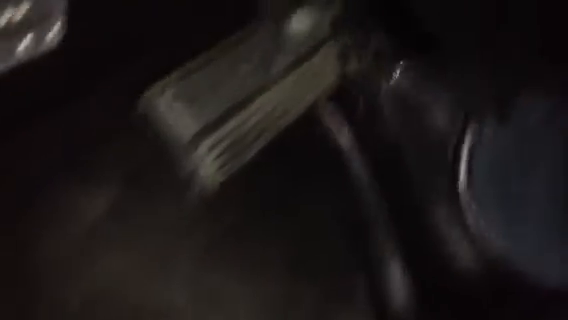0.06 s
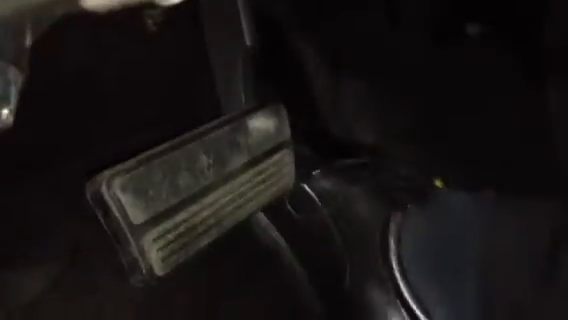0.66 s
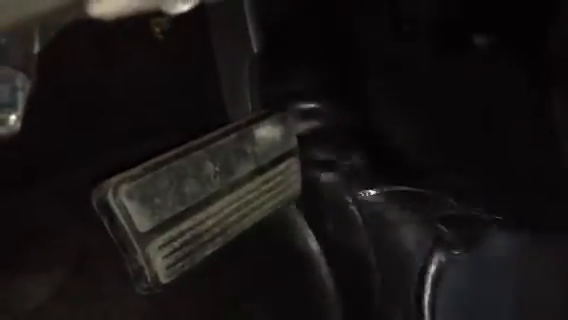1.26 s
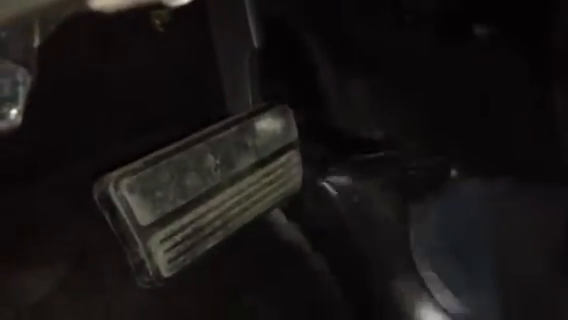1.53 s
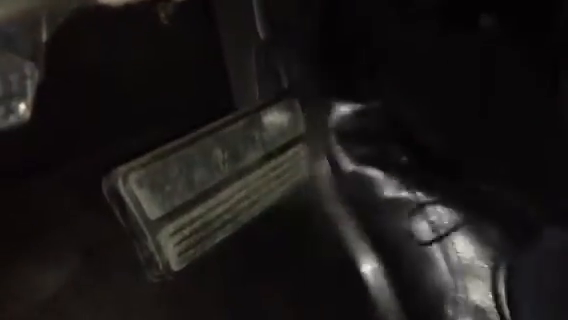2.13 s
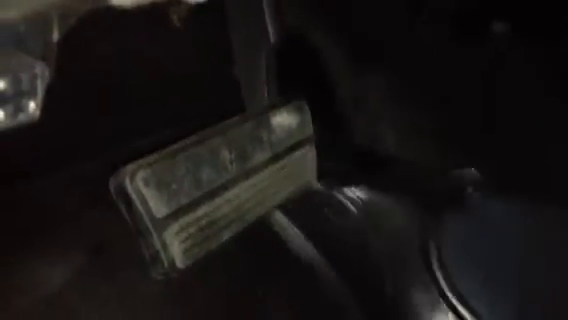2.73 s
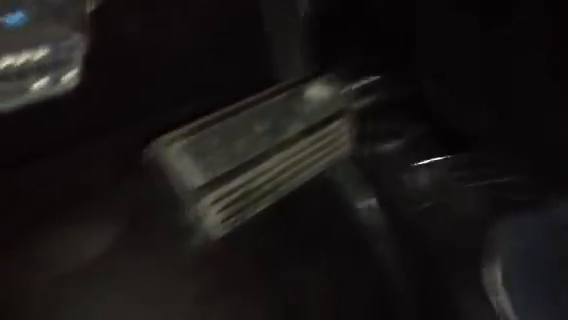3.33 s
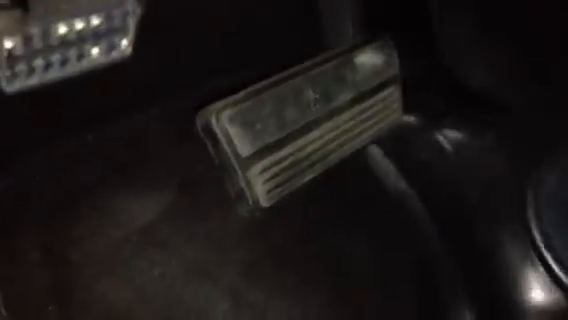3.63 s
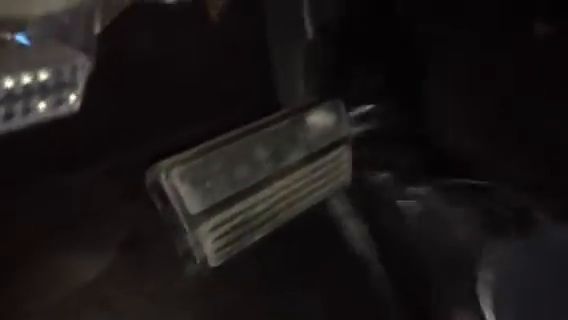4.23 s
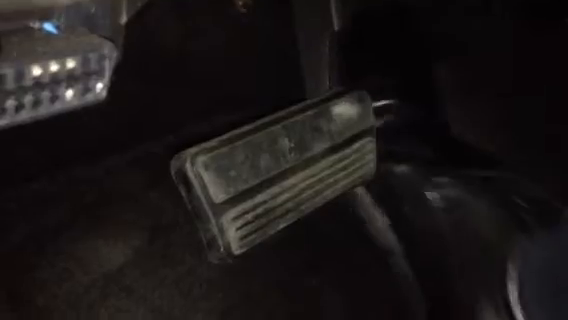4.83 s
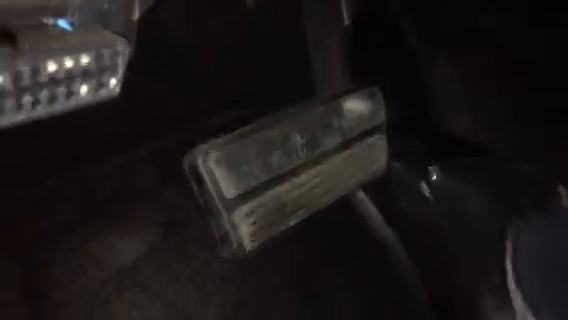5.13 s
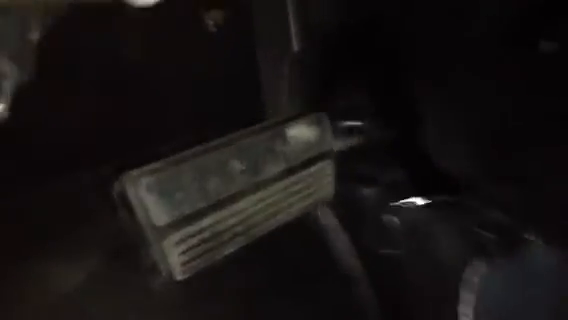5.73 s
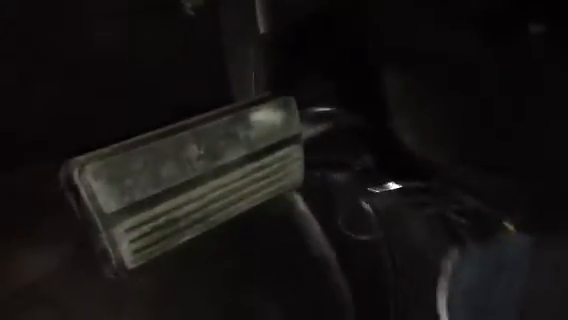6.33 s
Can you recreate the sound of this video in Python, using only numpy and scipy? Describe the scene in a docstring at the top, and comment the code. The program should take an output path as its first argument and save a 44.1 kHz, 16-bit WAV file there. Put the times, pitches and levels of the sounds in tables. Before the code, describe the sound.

Close in a car's footwell, a quickly pumped pedal rubs faintly and knocks against its stops, with some sharper clicks later on.

```python
"""Soft rubbing strokes come first, over faint steady noise: a shoe is pumping a parked car's accelerator.
We listen from close by in the footwell. The linkage (the parts the pedal moves) rubs on every stroke.
From about one second on, the pedal bumps its stops, which shakes the floor and makes the cabin boom briefly.
Now and then the plastic and the linkage click, and shoe and trouser cloth rustle as the foot moves."""
import sys
import numpy as np
from scipy import signal
from scipy.fft import rfft, irfft
from scipy.io import wavfile
from scipy.ndimage import uniform_filter1d

SR = 44100
rng = np.random.default_rng(int(sys.argv[2]) if len(sys.argv) > 2 else 0)


def to_wav(s):
    """Save 16-bit WAV."""
    ch = np.atleast_2d(s).T  # columns
    pcm = np.round(np.clip(ch, -1, 1) * 32767)  # PCM
    wavfile.write(sys.argv[1], SR, pcm.astype(np.int16))


N = 285371
TIME = np.arange(N) / SR
HIT_TIME = np.arange(SR // 4) / SR  # the time within one bump or click

# the pedal hits a stop; the rows near 4.99, 5.10 and 5.47 s give the low thud beneath a loud click: (time [s],
# level [dB], floor panel pitch [Hz], scuff level [dB])
BUMPS = [(0.995, -40, 240, -57), (1.071, -26, 233, -77), (1.303, -14, 237, -44.5),
         (1.4945, -19.5, 243, -66), (1.552, -27.5, 330, -45.5), (1.711, -29, 256, -51),
         (1.8146, -31.5, 251, -64.5), (2, -30.5, 284, -47), (2.122, -11, 243, -40.5),
         (2.194, -27, 240, -45.5), (2.3477, -36, 262, -50.5), (2.522, -30, 244, -62),
         (2.6994, -34, 263, -48.5), (2.7655, -19.5, 244, -68), (2.878, -36, 323, -50),
         (3.1046, -28.5, 262, -50), (3.16, -18, 241, -64), (3.2722, -30, 244, -53), (3.332, -43, 338, -53),
         (3.5643, -31, 253, -47), (3.6965, -34, 287, -50), (3.93, -31, 286, -48), (4.0794, -32.5, 288, -53),
         (4.2107, -28.5, 240, -72), (4.389, -25, 264, -49), (4.99, -28, 357, -50), (5.101, -22, 370, -32.5),
         (5.469, -36, 350, -70), (6.193, -41, 360, -55.5)]
# cabin air and trim ring on after a bump: (pitch [Hz], time to fade by 60 dB [s], gain [dB])
CABIN_TONES = [(99.7, 0.66, 20.5), (169.3, 0.3, 3), (209, 0.059, 7), (263, 0.067, 6), (331.2, 0.15, 3.5),
               (391.6, 0.079, 4.5), (684, 0.044, 13), (990, 0.034, 29.5)]
# a bump comes back from seats, doors and roof: (delay [s], gain [dB])
CABIN_ECHOES = [(0.0163, -23), (0.0349, -20)]
# plastic and linkage click: (time [s], level [dB], contact time [ms], rebound delay [ms])
PEDAL_CLICKS = [(2.189, -35.5, 0.49, 0.86), (2.191, -19.5, 0.042, 0.66), (2.7972, -24.5, 0.066, 0.6),
                (3.3015, -14.5, 0.048, 0.64), (3.3328, -31.5, 0.47, 0.81), (3.587, -34.5, 0.56, 0.33),
                (4.5706, -1.5, 0.12, 0.41), (4.5974, -12.5, 0.047, 0.35), (4.6657, -20, 0.29, 0.43),
                (4.7166, -32.5, 0.52, 0.36), (4.7836, -29.5, 0.49, 0.36), (4.9637, -22.5, 0.37, 0.5),
                (4.992, -5, 0.085, 0.396), (4.9935, -11, 0.96, 0.78), (5.0162, -7, 0.056, 0.29),
                (5.084, -25.5, 0.4, 0.91), (5.1012, -12, 0.28, 0.41), (5.102, -14, 0.038, 0.865),
                (5.103, -20, 0.76, 0.63), (5.4696, -21, 0.25, 0.43)]
# the tones that a click sets ringing: (pitch [Hz], width [Hz], gain [dB])
PLASTIC_TONES = [(597, 117, 14.5), (1210, 680, 4), (1836, 1170, 6.5), (3020, 900, 2), (7060, 3400, 2),
                 (12300, 3000, 4.5)]
# runs of pedal strokes: (first stroke [s], last stroke [s], first effort [dB], last effort [dB])
STROKE_RUNS = [(0.218, 0.41, -65.5, -71), (0.612, 1.417, -66.5, -64), (1.61, 2.25, -79, -64),
               (2.54, 3.298, -63.5, -62), (3.531, 4.49, -65.5, -65.5), (4.688, 5.414, -69.5, -63.5),
               (5.62, 5.987, -69, -71)]
# the tones of the rubbing linkage: (pitch [Hz], base width [Hz], gain [dB])
LINKAGE_TONES = [(2625, 480, 4.5), (3055, 560, 2), (5290, 120, 0.5), (6530, 2700, -8.5)]
# the shoe slides to a new place: (time [s], level [dB], half length [s])
SHOE_SLIDES = [(1.548, -55.5, 0.013), (1.633, -56, 0.056), (1.84, -61.5, 0.02), (2, -62, 0.019),
               (2.129, -57, 0.036), (5.128, -67, 0.044), (5.73, -65.5, 0.042), (5.94, -65, 0.55)]
# the tone colour of the rustle: (frequency [Hz], relative level [dB])
CLOTH_COLOUR = [(1500, 3), (3200, 4), (4500, -5.5), (5600, -2.5), (7400, 2), (9800, -5.5), (12000, -2),
                (15500, -7)]
# the tone colour of the background: (frequency [Hz], relative level [dB])
BACKGROUND_COLOUR = [(15, -58), (25, -39), (81, -12.5), (207, 2.5), (278, -4.5), (427, -10.5), (573, -7),
                     (833, -7), (1120, -9.5), (1310, -10.5), (1500, -12), (1810, -12), (2930, -25),
                     (9270, -32), (15000, -34)]
# the footwell lifts or lowers bands of the background: (frequency [Hz], width [Hz], gain [dB])
FOOTWELL_BANDS = [(102, 39, 7), (166, 9, -7.5), (204, 87, 2), (398, 67, -2.5), (833, 58, 4.5),
                  (1110, 64, -2.5), (1286, 69, 5.5), (1870, 210, 1), (4470, 580, -7.5)]
# the background sinks a little at the end: (time [s], gain [dB])
BACKGROUND_FADE = [(5.8, 0), (6.3, -1.3)]


def pedal_bumps(band_ratio=1.34, cushion_hz=560, lead_s=0.00065, scuff_s=0.0052, scuff_db=1,
                rumble_s=0.11, rumble_db=-30):
    """A cushioned bump shakes the floor panel; the cabin rings on, and the contact makes a short scuff."""
    out = np.zeros(N)
    push = butter(tap(), cushion_hz, "lowpass", order=3)
    for s, db, hz, contact_db in BUMPS:
        rumble_noise, scuff_noise = rng.standard_normal((2, len(HIT_TIME)))
        panel = butter(push, [hz / band_ratio, hz * band_ratio], "bandpass")
        cabin = sum(undb(gain_db) * resonate(panel, tone_hz, np.log(1000) / (np.pi * fade_s))
                    for tone_hz, fade_s, gain_db in CABIN_TONES)
        boom = (panel + cabin) / np.abs(panel + cabin).max()
        # many weaker tones of the car body blur into a short rumble
        rumble = unit(butter(rumble_noise, [80, 330], "bandpass")) * np.exp(-HIT_TIME / rumble_s)
        add(out, s - lead_s, undb(db) * (boom + undb(rumble_db) * rumble))
        for delay_s, echo_db in CABIN_ECHOES:
            add(out, s - lead_s + delay_s, undb(db + echo_db) * boom)
        scuff = unit(butter(scuff_noise, [600, 3600], "bandpass")) * np.exp(-HIT_TIME / scuff_s)
        add(out, s, undb(contact_db + scuff_db) * scuff)
    return out


def pedal_clicks(rebound=0.38, tail_db=-13, tail_s=0.0016, lead_s=0.00018):
    """A shorter contact makes a brighter click; the part springs back, which makes it sound hollow."""
    out = np.zeros(N)
    freqs = np.fft.rfftfreq(len(HIT_TIME), 1 / SR)
    for s, db, contact_ms, rebound_ms in PEDAL_CLICKS:
        push = butter(tap(), 1000 / (2 * contact_ms), "lowpass", order=4)
        delay = np.exp(-2j * np.pi * freqs * rebound_ms / 1000)
        push = push - rebound * irfft(rfft(push) * delay, len(push))
        ring = sum(undb(gain_db) * resonate(push, hz, width) for hz, width, gain_db in PLASTIC_TONES)
        # nearby trim scatters the high tones for a moment before the carpet swallows them
        scatter = rng.standard_normal(len(HIT_TIME)) * np.exp(-HIT_TIME / tail_s)
        scattered = signal.fftconvolve(ring, scatter / np.linalg.norm(scatter))[:len(ring)]
        tail = butter(scattered, 620, "highpass")
        add(out, s - lead_s, undb(db) * (ring + undb(tail_db) * tail) / np.abs(ring).max())
    return out


def pedal_speed(stroke_gap_s=0.195, half_stroke_s=0.034):
    """The speed swells once per stroke; within a run the pace is even and the effort changes steadily."""
    speed = np.zeros(N)
    for first_s, last_s, first_db, last_db in STROKE_RUNS:
        count = round((last_s - first_s) / stroke_gap_s) + 1
        for s, db in np.linspace((first_s, first_db), (last_s, last_db), count):
            speed += undb(db) * swell(s, half_stroke_s)
    return speed


def linkage_rub(speed, grain_db=3.0, gain_db=3, shift_db=1.1):
    """Dry rubbing grows louder with the pedal's speed; the mix of its tones drifts at random."""
    friction = rng.standard_normal(N) * undb(grain_db * wander(320))
    rub = np.zeros(N)
    for hz, width, db in LINKAGE_TONES:
        band = resonate(friction, hz, 1.4 * width)
        band = resonate(band, hz, 1.4 * width)  # a second pass narrows the band
        rub += undb(db + shift_db * wander(6.5)) * band
    return undb(gain_db) * speed * unit(rub)


def cloth_rustle(speed, grain_db=1.5, stroke_db=-4):
    """Fibres slip past each other in a grainy hiss: a little on each stroke, more when the shoe slides."""
    slides = sum(undb(db) * swell(s, half_s) for s, db, half_s in SHOE_SLIDES)
    movement = undb(stroke_db) * speed + slides
    return noise(CLOTH_COLOUR) * movement * undb(grain_db * wander(400))


def background(level_db=-51.44, waver_db=0.44):
    """Faint steady noise inside the closed car."""
    drift_db = np.interp(TIME, *np.transpose(BACKGROUND_FADE)) + waver_db * wander(5.1)
    return noise(BACKGROUND_COLOUR, FOOTWELL_BANDS) * undb(level_db + drift_db)


def undb(db):
    """Turn decibels into a factor to multiply by."""
    return 10 ** (np.asarray(db) / 20)


def unit(x):
    """Scale to an average (rms) level of 1."""
    return x / np.sqrt(np.mean(x ** 2))


def add(track, s, sound):
    """Mix a sound into a track at s seconds."""
    start = max(int(s * SR), 0)
    part = sound[:N - start]
    track[start:start + len(part)] += part


def butter(x, hz, kind, order=2):
    """A smooth filter that keeps the lows, the highs or a band."""
    return signal.sosfilt(signal.butter(order, np.minimum(hz, .45 * SR), kind, fs=SR, output="sos"), x)


def resonate(x, hz, width):
    """Ring at one pitch; a narrower width rings longer."""
    return signal.lfilter(*signal.iirpeak(hz, hz / width, fs=SR), x)


def noise(colour, bands=()):
    """Noise of level 1 with a given tone colour and optional lifted or lowered bands."""
    freqs = np.maximum(np.fft.rfftfreq(N, 1 / SR), 1)
    hz, db = np.transpose(colour)
    curve_db = np.interp(np.log(freqs), np.log(hz), db)
    for centre, width, gain_db in bands:
        curve_db += gain_db / (1 + (2 * (freqs - centre) / width) ** 2)
    return unit(irfft(rfft(rng.standard_normal(N)) * undb(curve_db), N))


def wander(rate_hz):
    """A curve of level 1 that glides from one random value to the next."""
    step = max(int(SR / rate_hz), 1)
    stairs = np.repeat(rng.standard_normal(N // step + 1), step)
    return unit(uniform_filter1d(stairs, step)[:N])


def tap():
    """The shortest possible tap, then silence."""
    return signal.unit_impulse(len(HIT_TIME)) + 1e-18


def swell(s, half_s):
    """A smooth rise and fall around s seconds."""
    return np.exp(-((TIME - s) / half_s) ** 2 / 2)


def scene():
    """All the sounds together at one microphone."""
    speed = pedal_speed()
    mix = pedal_bumps() + pedal_clicks() + linkage_rub(speed) + cloth_rustle(speed) + background()
    return mix[None, :]


def record(dry, bass_hz=45, top_hz=15600):
    """The small microphone loses the deepest bass; the recorder cuts the highest treble."""
    thin = butter(dry, bass_hz, "highpass")
    return signal.sosfilt(signal.ellip(8, .2, 70, top_hz, fs=SR, output="sos"), thin)


dry = scene()
out = record(dry)
to_wav(out)
```